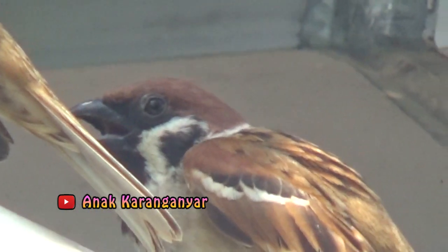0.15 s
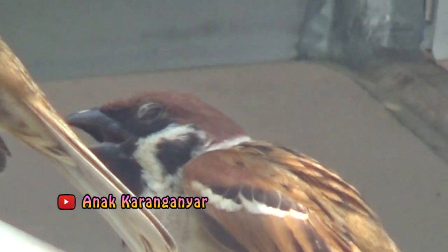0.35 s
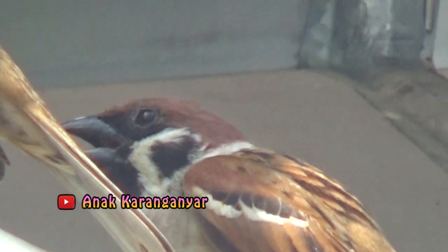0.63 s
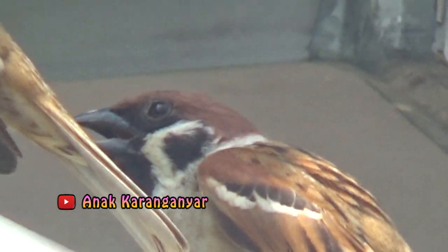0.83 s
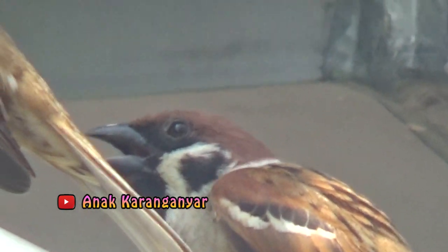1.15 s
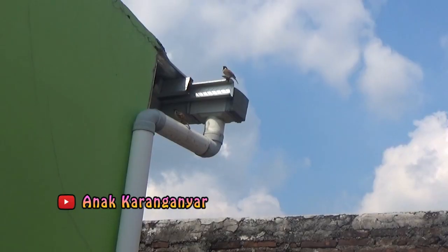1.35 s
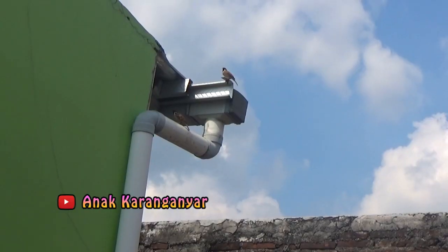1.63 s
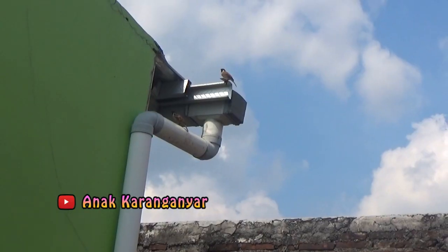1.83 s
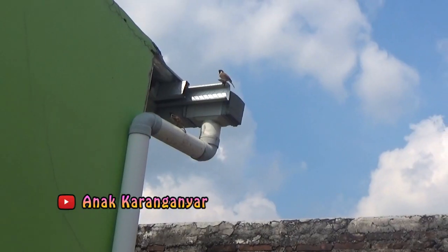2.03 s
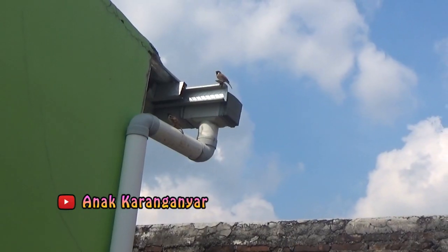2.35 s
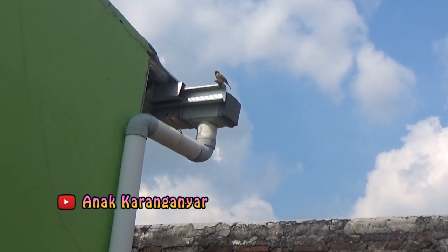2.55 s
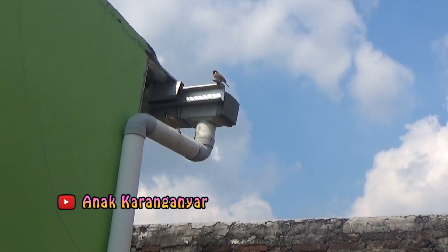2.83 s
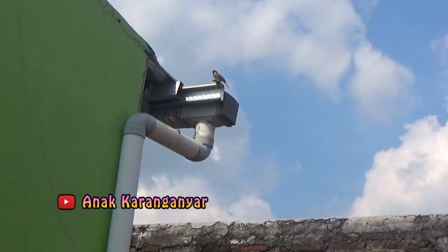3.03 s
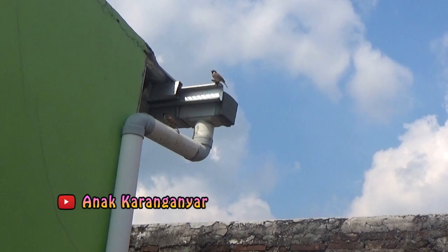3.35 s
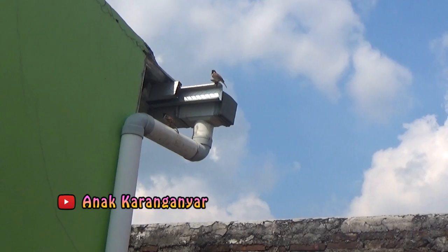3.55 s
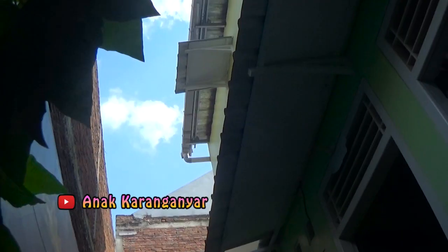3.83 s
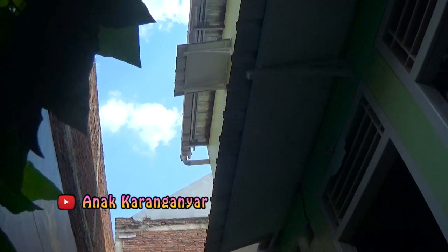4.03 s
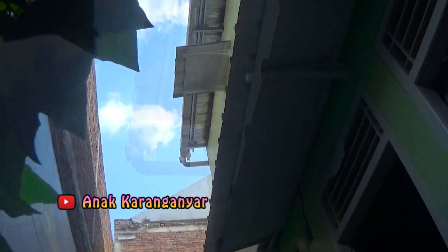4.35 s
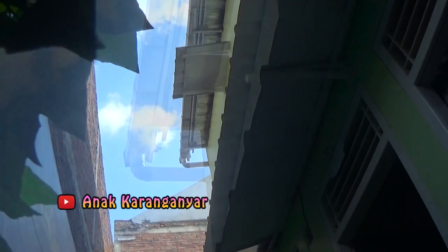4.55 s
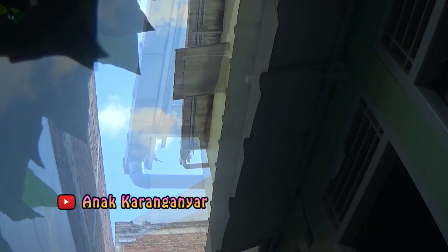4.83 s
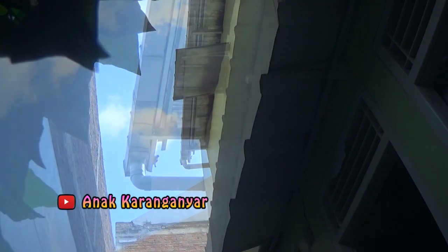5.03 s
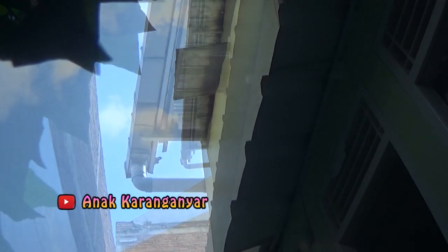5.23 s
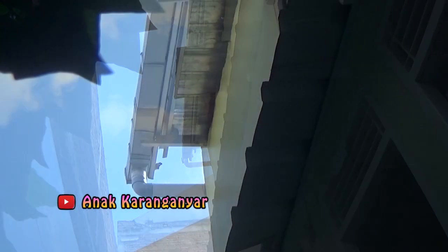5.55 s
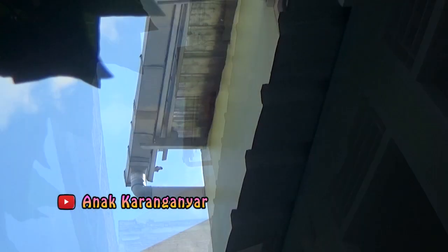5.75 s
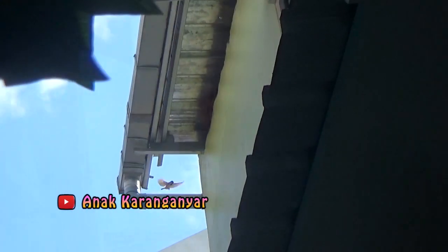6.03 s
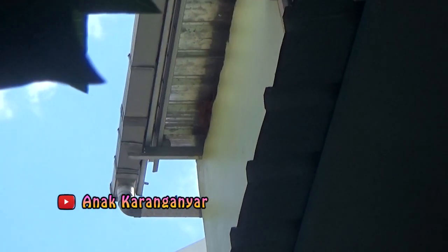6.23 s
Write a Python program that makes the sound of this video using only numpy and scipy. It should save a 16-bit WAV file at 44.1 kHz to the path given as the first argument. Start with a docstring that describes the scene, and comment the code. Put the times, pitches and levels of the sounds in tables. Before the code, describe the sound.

Small birds scold and chirp busily on a rooftop outdoors, over a soft hiss and faint distant traffic.

```python
"""Sparrows chatter in quick bouts on the gutters above a small walled yard.
Each note is a harmonic series from a vibrating syrinx membrane, roughened by modulation: harsh
arches alternate with raspy falling chirps and clean whistles, and later with nasal calls and flicks.
Reflections from the walls smear the notes. Underneath lie dull knocks, dry ticks, faint hums, far
traffic and a high hiss that swells with the blurred wash of the flock's chatter, all filtered noise."""
import sys
import numpy as np
from scipy import signal
from scipy.fft import rfft, irfft
from scipy.io import wavfile

SR = 44100
rng = np.random.default_rng(int(sys.argv[2]) if len(sys.argv) > 2 else 0)


def waveform_to_disk(signal):
    """Save audio, clipped to [-1, 1], as 16-bit WAV at the path in sys.argv[1]."""
    frames = np.transpose(np.atleast_2d(signal))
    scaled = np.clip(frames, -1, 1) * 32767
    samples = np.round(scaled).astype(np.int16)
    wavfile.write(sys.argv[1], SR, samples)


N = 281799
T = np.arange(N) / SR


def from_db(db):
    """Amplitude grows tenfold for every 20 dB."""
    return 10 ** (np.asarray(db) / 20)


def rms_one(x):
    """Normalisation to unit mean power."""
    return x / np.sqrt(np.mean(x ** 2) + 1e-20)


def at_hz(points, hz):
    """Interpolation on a logarithmic frequency axis."""
    points = np.array(points)
    return np.interp(np.log(hz + 1), np.log(points[:, 0]), points[:, 1])


def colour(x, spectrum):
    """Spectral weighting of a noise, at unit power."""
    size = x.shape[-1]
    gain = from_db(at_hz(spectrum, np.fft.rfftfreq(size, 1 / SR)))
    return rms_one(irfft(rfft(x) * gain, size))


def band(x, hz, kind):
    """Filtering with a maximally flat passband."""
    return signal.sosfilt(signal.butter(2, np.clip(hz, 10, .45 * SR), kind, fs=SR, output="sos"), x)


def wobble(size, hz):
    """Random fluctuation: low-passed noise of unit power."""
    return rms_one(band(rng.standard_normal(2 * size), hz, "low")[size:])


def add(out, s, sound):
    """Superposition: a sound sums into the track from time s."""
    start = max(0, int(s * SR))
    part = sound[..., :max(0, N - start)]
    out[..., start:start + part.shape[-1]] += part


# likeness of left and right: (frequency [Hz], coherence [0-1])
COHERENCE = [(30, .8), (100, 0.96), (350, 0.82), (700, 0.41), (1400, 0.27), (3000, 0.69), (6000, 0.8),
             (9500, 0.99), (13000, 1)]
def stereo_noise(size):
    """A diffuse field is partly coherent at two close microphones."""
    mid, side = rfft(rng.standard_normal((2, size)))
    alike = np.clip(at_hz(COHERENCE, np.fft.rfftfreq(size, 1 / SR)), 0, 1)
    return rms_one(irfft(np.sqrt(1 + alike) * mid + np.sqrt(1 - alike) * side * [[1], [-1]], size))


def yard(x, direct_db=-3.5, early_db=.5, early_t60=.21, late_db=-6.5, late_t60=.43):
    """Reverberation: direct sound, dense wall echoes and a tail; by default from the nearest gutter."""
    t = T[:SR // 2]
    # each note has its own echoes, as a bird turns and hops
    early = stereo_noise(len(t)) * from_db(early_db - 60 * t / early_t60)
    late = band(stereo_noise(len(t)), [2600, 8000], "band") * from_db(late_db - 60 * t / late_t60)
    response = (early + late) * (1 - np.exp(-t / .003)) / np.sqrt(SR / 50)
    response[:, 0] += from_db(direct_db)
    return signal.fftconvolve(x[None], response, axes=1)


# air through the beak: (frequency [Hz], spectral level [dB])
BEAK_HISS = [(1200, -46), (2100, 6), (2700, -1), (4200, 2), (6500, -1.5), (8000, -8.5), (12000, -32),
             (15500, -90)]
def syrinx(length, contour, partials, flutter, flutter_hz, jitter, shimmer, hiss_db, rise, fall):
    """A membrane glides through three pitches; frequency and amplitude modulation roughen its tone."""
    size = int(length * SR)
    progress = np.linspace(0, 1, size)
    pitch = np.polyval(np.polyfit([0, .5, 1], contour, 2), progress)
    shake_hz = flutter_hz * (1 + .072 * wobble(size, 124))
    shake = np.sin(2 * np.pi * (rng.random() + np.cumsum(shake_hz) / SR))
    pitch *= 1 + flutter * shake + jitter * wobble(size, 690)
    phase = 2 * np.pi * np.cumsum(pitch) / SR
    tone = sum(from_db(db) * np.sin(round(k) * phase) for k, db in partials)
    tone = rms_one(tone * np.exp(shimmer * np.tanh(wobble(size, 535))))
    hiss = from_db(hiss_db) * colour(rng.standard_normal(size), BEAK_HISS)
    attack = np.sin(np.pi / 2 * np.clip(progress / rise, 0, 1)) ** 2
    release = np.sin(np.pi / 2 * np.clip((1 - progress) / fall, 0, 1)) ** 2
    return attack * release * (tone + hiss)


def throat(x, hz=6020, width_hz=2480, boost_db=9.4):
    """Resonance of the windpipe and beak lifts any partial that sweeps through it."""
    b, a = signal.iirpeak(hz, hz / width_hz, fs=SR)
    return x + (from_db(boost_db) - 1) * signal.lfilter(b, a, x)


# upper partials of a scolding note: (harmonic [number], level [dB])
CHATTER_PARTIALS = [(3, -0.5), (4, -15), (5, -17), (6, -17), (7, -29)]
def chatter_note(pitch, first_db, second_db, length, rough):
    """A harsh pitch arch carries the third harmonic through the throat resonance."""
    partials = [(1, first_db), (2, second_db)] + CHATTER_PARTIALS
    note = syrinx(length, pitch * np.array([.86, 1.03, .85]), partials, flutter=.1 * rough,
                  flutter_hz=524.2, jitter=.0866 * rough, shimmer=rough, hiss_db=-7, rise=.44, fall=.39)
    return throat(note)


# scolding notes: (time [s], relative level [dB], nominal pitch [Hz])
CHATTER = [(0.0, -34, 1900), (0.043, -27.5, 2018), (0.122, -27, 2160), (0.234, -28, 1994),
           (0.311, -27.5, 2098), (1.144, -30.5, 1928), (1.222, -31, 2103), (1.626, -31, 2011),
           (1.693, -29, 1980), (1.785, -27.5, 2203), (1.851, -26, 2230), (1.961, -23.5, 2107),
           (2.027, -23, 2178), (2.103, -23, 2050), (2.186, -22, 2030), (2.277, -22, 2008),
           (2.367, -24.5, 1925), (2.453, -24, 2105), (2.555, -23, 1963), (2.830, -25, 1927),
           (2.909, -23.5, 2080), (3.040, -24, 1993), (3.189, -23, 2058), (3.276, -22, 2102),
           (3.349, -23, 2091), (3.448, -21, 1990), (3.547, -23.5, 2077), (4.751, -33.5, 2030),
           (4.811, -29, 1960), (4.870, -30, 1970), (4.965, -31, 2000)]
def chatter(usual_db=-27, usual_hz=2070):
    """Timbre follows effort: louder notes are cleaner and gather on the third harmonic."""
    out = np.zeros((2, N))
    for s, db, pitch in CHATTER:
        effort_db = max(db - usual_db, 0)
        second_db = 1 + .005 * (pitch - usual_hz) - .54 * effort_db
        note = chatter_note(pitch, -3.5, second_db, length=.033, rough=.6 - .028 * effort_db)
        add(out, s - .006, yard(from_db(db - 11) * note))
    return out


# background noise: (frequency [Hz], spectral level [dB])
AMBIENT_SPECTRUM = [(18, -56), (30, -33), (108, -16.5), (177, -12), (213, -9.5), (341, -4), (410, -5.5),
                    (492, -4.5), (673, -7), (1140, -10), (1330, -12), (1590, -12), (1770, -12.5),
                    (4660, -17), (15500, -28)]
# far traffic: (time [s], relative level [dB])
RUMBLE_LEVEL = [(0.0, -59.5), (1.12, -61.5), (1.55, -58), (3.26, -58), (3.54, -52.5), (3.75, -58.5),
                (6.39, -61.5)]
# high background hiss, swelling with the blurred wash of the flock's chatter: (time [s], level [dB])
WASH_LEVEL = [(0, -49.5), (1.2, -50), (1.4, -55), (2.3, -49.5), (3.6, -51), (4.3, -54.5), (5.75, -55.5),
              (6.39, -52.5)]
def neighbourhood():
    """Diffuse noise in two swelling bands: traffic rumble below, the hiss of blurred chatter above."""
    rumble = rms_one(band(colour(stereo_noise(N), AMBIENT_SPECTRUM), 815, "low"))
    wash = rms_one(band(colour(stereo_noise(N), AMBIENT_SPECTRUM), 1050, "high"))
    rumble_db = np.interp(T, *np.transpose(RUMBLE_LEVEL)) + .6
    wash_db = np.interp(T, *np.transpose(WASH_LEVEL))
    return from_db(rumble_db) * rumble + from_db(wash_db) * wash


# scolding further along the roof: (start [s], end [s], relative level [dB])
FAR_BOUTS = [(0.03, 1.10, -40), (2.665, 2.71, -41)]
def far_chatter(interval_s=.079):
    """Distance weakens the direct sound, and longer reverberation blurs the drawn-out notes."""
    out = np.zeros((2, N))
    for start, end, db in FAR_BOUTS:
        for s in np.arange(start, end, interval_s):
            pitch = 1960 + 150 * rng.uniform(-1.005, 1)
            note = chatter_note(pitch, first_db=7, second_db=5.5, length=.065, rough=.68)
            onset = s + .012 * rng.uniform(-1, 1)
            heard = yard(note, direct_db=-7.5, early_db=-13.5, early_t60=.68, late_db=-10, late_t60=.94)
            add(out, onset, from_db(db - 3.5) * heard)
    return out


# dull knocks: (time [s], relative level [dB], band frequency [Hz])
KNOCKS = [(.031, -48.5, 1440), (.510, -49.5, 880), (.558, -43, 1410), (2.700, -48, 1560),
          (3.360, -44.5, 580), (3.441, -43, 380), (3.450, -38, 607), (4.076, -49, 540),
          (4.079, -50.5, 1500), (4.246, -53, 885), (4.948, -41.5, 1640), (5.840, -52, 620)]
def knocks(t60=.32):
    """Distant blows arrive as a band of exponentially decaying reverberation."""
    out, t = np.zeros((2, N)), T[:SR // 2]
    for s, db, hz in KNOCKS:
        body = rms_one(band(stereo_noise(len(t)), [hz / 1.37, hz * 1.25], "band"))
        add(out, s, body * from_db(db + 3 - 60 * t / t60) * (1 - np.exp(-t / .002)))
    return out


def glide(pitch, hz_per_s, length):
    """A linear sweep, given by its start, middle and end frequencies."""
    return pitch + hz_per_s * length * np.array([-.5, 0, .5])


# partials of chirps and whistles: (harmonic [number], level [dB])
CHIRP_PARTIALS = [(1, 12.5), (2, -9.5), (3, -33)]
def chirp_note(length, contour, rasp):
    """Modulation sidebands widen a whistle into a buzz as rasp grows."""
    return syrinx(length, contour, CHIRP_PARTIALS, flutter=.24 * rasp, flutter_hz=400.9,
                  jitter=.051 * rasp, shimmer=1.12 * rasp, hiss_db=-26 + 17 * rasp, rise=.19, fall=.4)


# raspy chirps: (time [s], duration [s], middle pitch [Hz], level [dB], rasp [0-1])
CHIRPS = [(.345, .048, 3763, -33.5, .7), (1.194, 0.049, 4545, -32.5, 0.77), (1.478, .023, 3450, -53, .3),
          (2.334, 0.05, 4230, -26, .5), (3.098, .035, 3500, -35, 0.52), (3.385, .046, 4200, -24, .6),
          (3.66, .033, 3180, -45, 0.7), (3.694, .059, 4650, -39.5, .7), (3.947, .072, 4063, -33.5, .95),
          (4.053, 0.037, 4850, -39.5, .7), (4.102, .052, 3660, -47, .8), (4.496, 0.097, 4590, -42.5, .5),
          (4.737, 0.056, 4490, -37, 0.84), (4.883, .040, 4650, -36, .7), (4.973, .051, 4200, -38, 0.95),
          (5.363, .034, 4850, -40.5, .5), (5.385, .033, 4100, -43.5, .8), (5.496, .022, 5600, -51.5, .6),
          (6.128, .039, 4890, -37.5, 0.74), (6.253, .034, 4745, -35, .65), (6.360, 0.041, 4800, -35, .55)]
def chirps(sweep_hz_per_s=-20000, arch_hz=120):
    """Deep modulation of a steep, slightly arched sweep gives a falling buzz."""
    out = np.zeros((2, N))
    for s, length, pitch, db, rasp in CHIRPS:
        contour = glide(pitch, sweep_hz_per_s, length) - arch_hz * np.array([1, 0, 1])
        add(out, s - .003, yard(from_db(db) * chirp_note(length, contour, rasp)))
    return out


# distant piping: (time [s], duration [s], middle pitch [Hz], level [dB])
FAR_WHISTLES = [(1.085, .045, 1150, -53), (1.289, .110, 938, -57.5), (3.78, .055, 1103, -54.5)]
def far_whistles(sweep_hz_per_s=870):
    """A lone, unsteady fundamental rises gently, prolonged by reverberation."""
    out = np.zeros((2, N))
    for s, length, pitch, db in FAR_WHISTLES:
        note = syrinx(length, glide(pitch, sweep_hz_per_s, length), [(1, 0)], flutter=.0073,
                      flutter_hz=60, jitter=.075, shimmer=.7, hiss_db=-30, rise=.3, fall=.4)
        heard = yard(note, direct_db=0, early_db=-1, early_t60=.42, late_db=-14, late_t60=.6)
        add(out, s, from_db(db) * heard)
    return out


# clean whistles: (time [s], duration [s], start pitch [Hz], end pitch [Hz], level [dB])
WHISTLES = [(1.201, 0.053, 2950, 3280, -35), (1.949, .030, 3580, 3360, -32.5),
            (1.976, .085, 3290, 2970, -40.5), (2.326, 0.025, 5600, 5580, -34),
            (4.578, .073, 3510, 3310, -51.5), (4.683, .049, 4980, 5500, -50)]
def whistles():
    """Shallow modulation leaves a nearly pure gliding tone."""
    out = np.zeros((2, N))
    for s, length, start, end, db in WHISTLES:
        note = chirp_note(length, [start, (start + end) / 2, end], rasp=.16)
        add(out, s - .003, yard(from_db(db) * note))
    return out


# faint hums: (start [s], end [s], frequency [Hz], level [dB])
HUMS = [(1.25, 3.40, 351, -64.5), (3.796, 5.308, 178, -69.5), (3.85, 5.20, 134, -73.5),
        (4.40, 5.30, 248, -67.5)]
def hums(fade_s=.17):
    """Noise confined to a narrow band is heard as a pitch."""
    out = np.zeros((2, N))
    for start, end, hz, db in HUMS:
        fade = np.clip(np.minimum(T - start, end - T) / fade_s, 0, 1)
        hum = rms_one(band(rng.standard_normal(N), [hz / 1.054, hz * 1.061], "band"))
        out += fade * from_db(db) * hum
    return out


# dry ticks: (time [s], relative level [dB])
TICKS = [(1.486, -47), (4.451, -47), (4.955, -36), (5.360, -46), (5.798, -45.5)]
def ticks(t60=.18):
    """Tiny taps are broadband transients with an exponential decay."""
    out, t = np.zeros((2, N)), T[:SR // 20]
    for s, db in TICKS:
        burst = band(rng.standard_normal(len(t)), [1800, 9500], "band")
        add(out, s, yard(from_db(db + 2 - 60 * t / t60) * burst))
    return out


# partials of a nasal call: (harmonic [number], level [dB])
MEW_PARTIALS = [(1, -10.5), (2, -1.5), (3, -5), (4, -6)]
# nasal calls: (time [s], duration [s], top pitch [Hz], level [dB])
MEWS = [(5.83, .07, 1720, -52.5), (6.145, .043, 1698, -41.5), (6.263, .060, 1780, -42),
        (6.366, .035, 1724, -40.5)]
def mews():
    """Overtones stronger than the fundamental give a shallow arch its nasal timbre."""
    out = np.zeros((2, N))
    for s, length, pitch, db in MEWS:
        note = syrinx(length, pitch * np.array([.9, 1, .88]), MEW_PARTIALS, flutter=.008,
                      flutter_hz=297, jitter=.016, shimmer=.99, hiss_db=-23, rise=.14, fall=.2)
        add(out, s, yard(from_db(db) * note))
    return out


# upward flicks: (time [s], relative level [dB])
FLICKS = [(5.899, -31.5), (5.974, -30.5), (6.071, -27.5), (6.148, -26), (6.308, -31)]
def flicks(length=.017):
    """A brief rising sweep drives the third harmonic into the throat resonance."""
    out = np.zeros((2, N))
    contour = 2188 * np.array([.72, .91, .98])
    for s, db in FLICKS:
        note = syrinx(length, contour, [(1, -8.5), (2, -7), (3, .5), (4, -9.5)], flutter=.03,
                      flutter_hz=530, jitter=.04, shimmer=.5, hiss_db=-5, rise=.5, fall=.4)
        add(out, s - .003, yard(from_db(db - 12) * throat(note)))
    return out


def microphones(x, lag_s=9e-6):
    """Stereo level and time cues: the left channel is slightly louder and later."""
    delay = np.exp(-2j * np.pi * np.fft.rfftfreq(N, 1 / SR) * lag_s)
    left = irfft(rfft(x[0]) * delay, N)
    return np.array([left, x[1]]) * from_db([[.45], [-.45]])


def scene():
    """Sound pressures add: birds and ticks over the background."""
    calls = chatter() + far_chatter() + chirps() + far_whistles() + whistles() + mews() + flicks()
    return microphones(calls + ticks()) + neighbourhood() + knocks() + hums()


def record(dry):
    """Band limiting: a steep low-pass filter removes the highest treble."""
    return signal.sosfilt(signal.ellip(12, .1, 80, 15750, fs=SR, output="sos"), dry)


dry = scene()
out = record(dry)
waveform_to_disk(out)
```